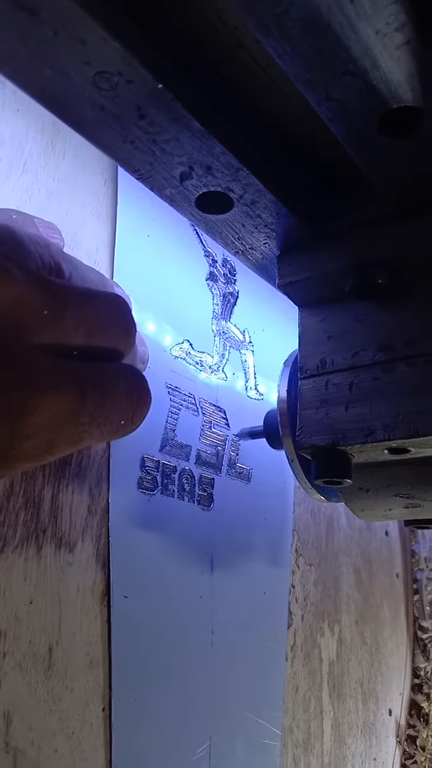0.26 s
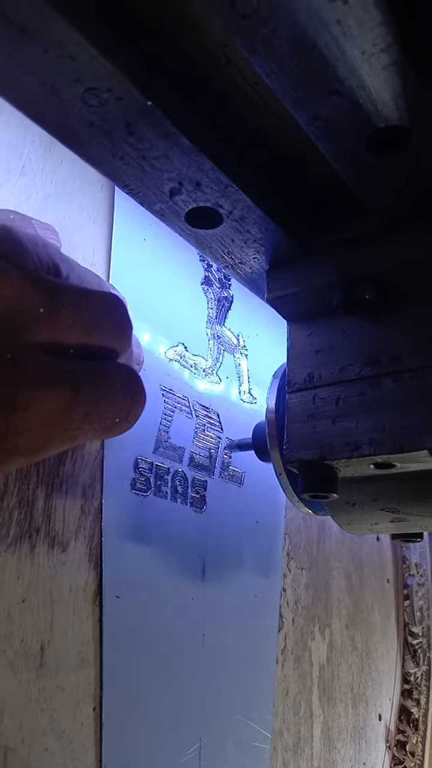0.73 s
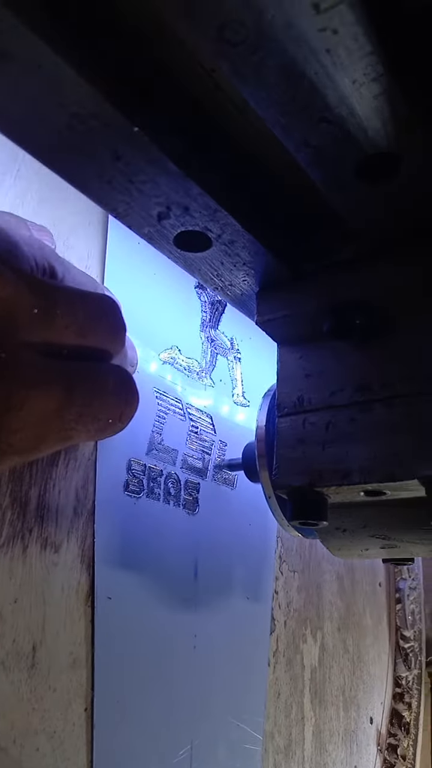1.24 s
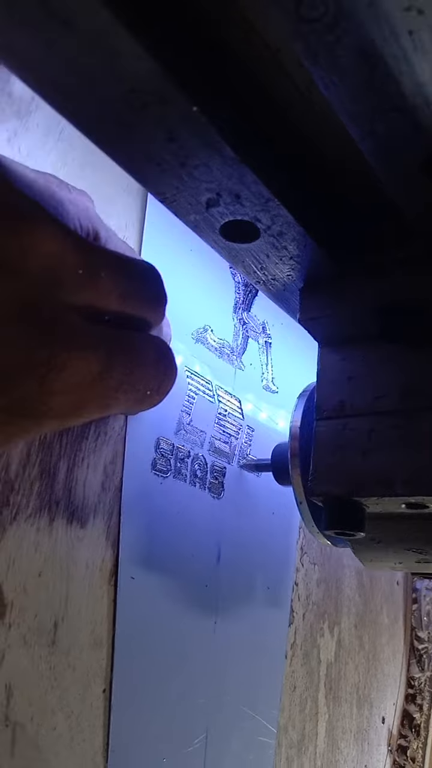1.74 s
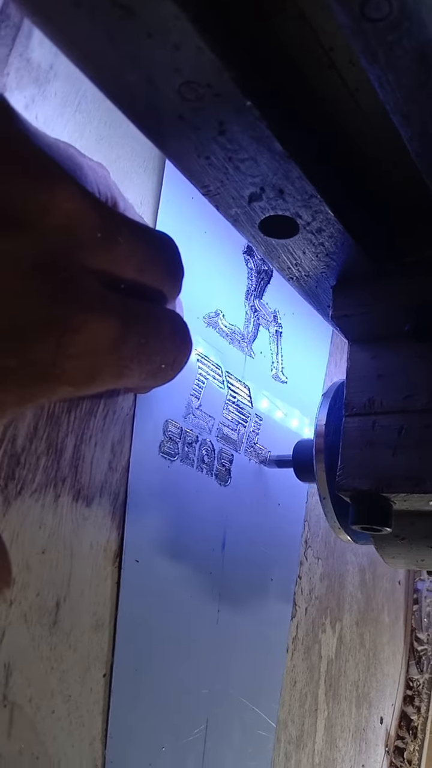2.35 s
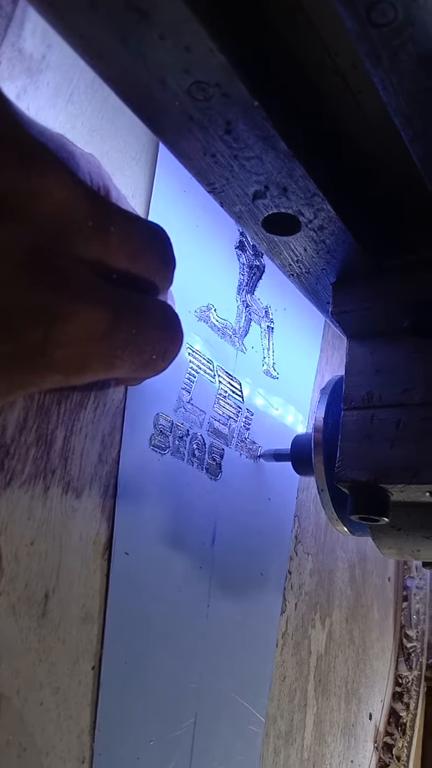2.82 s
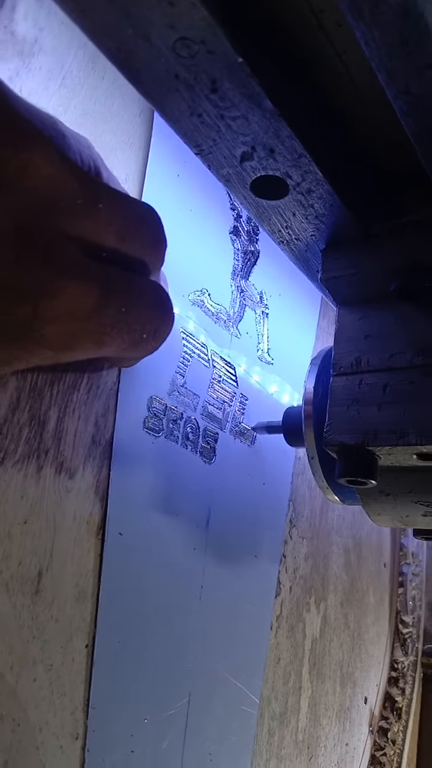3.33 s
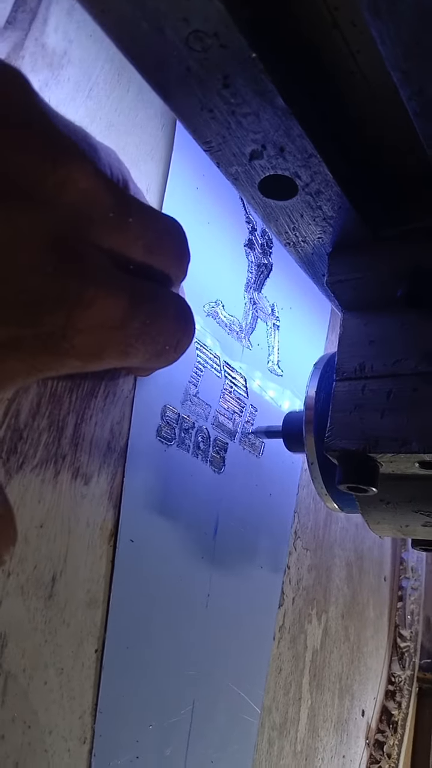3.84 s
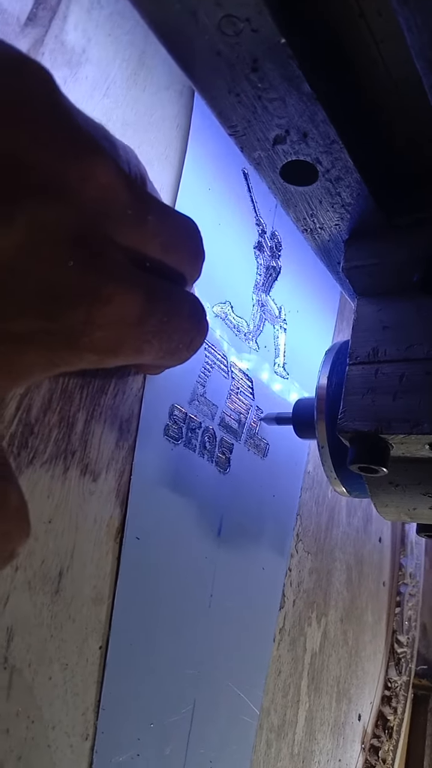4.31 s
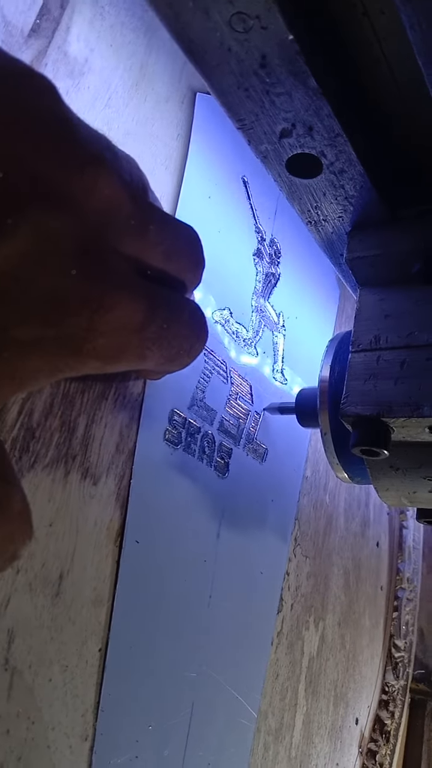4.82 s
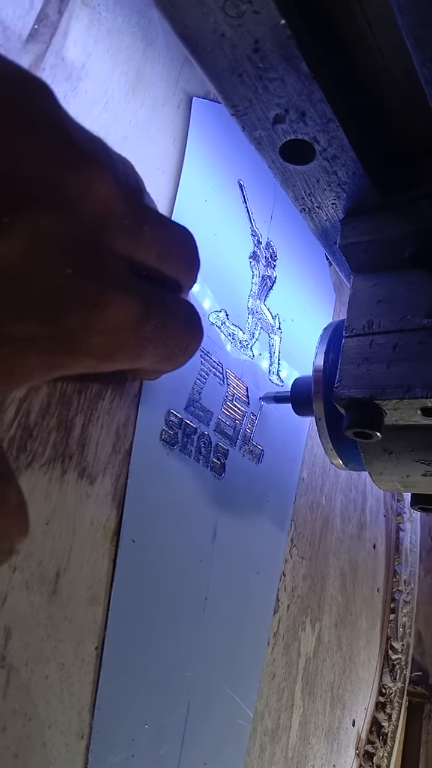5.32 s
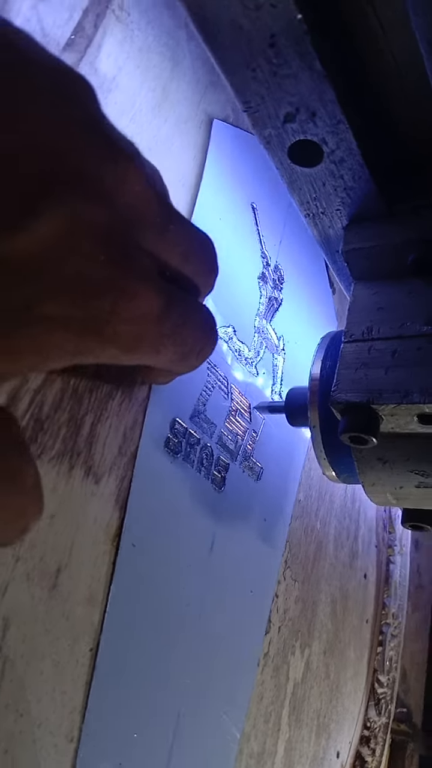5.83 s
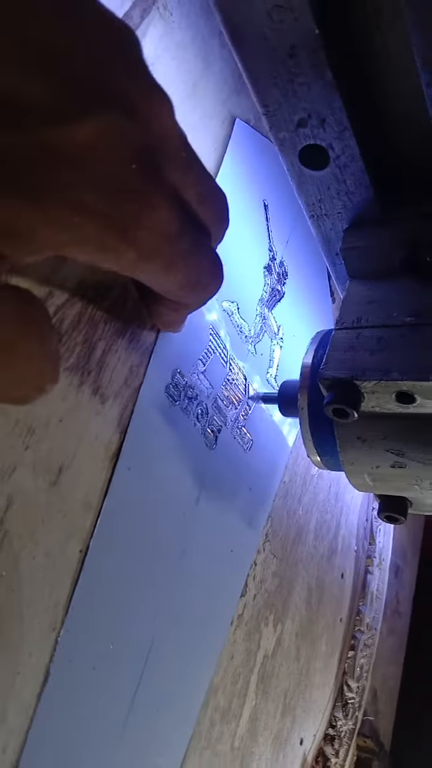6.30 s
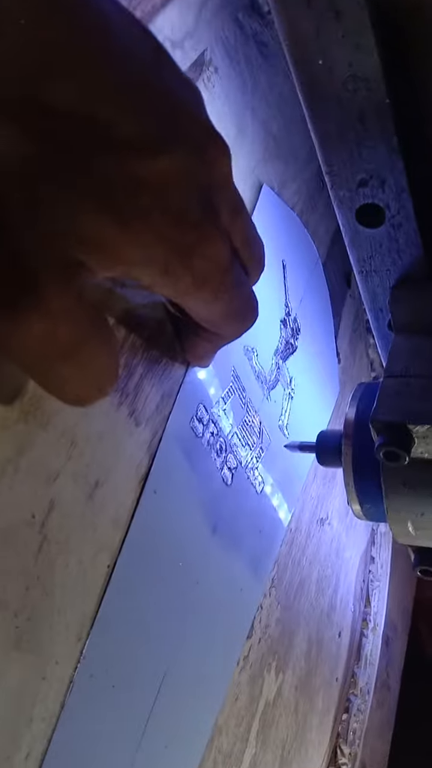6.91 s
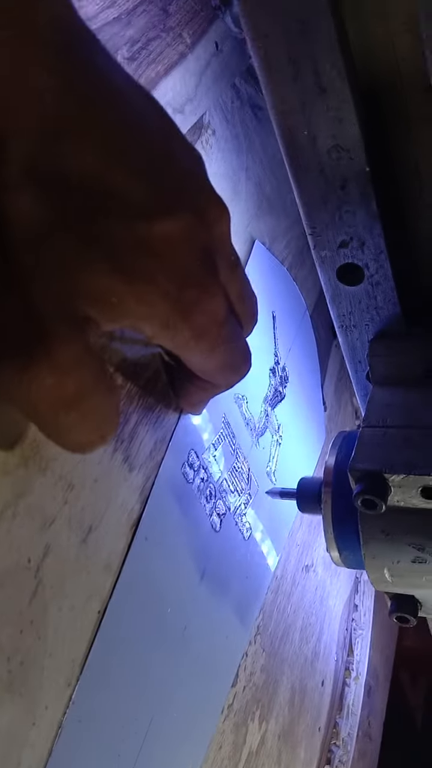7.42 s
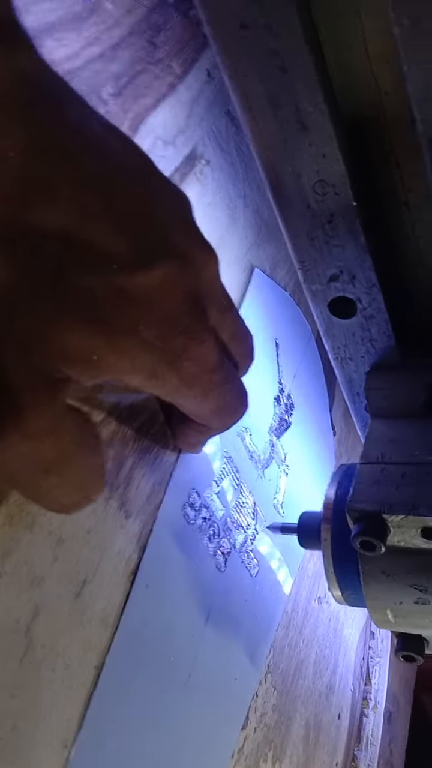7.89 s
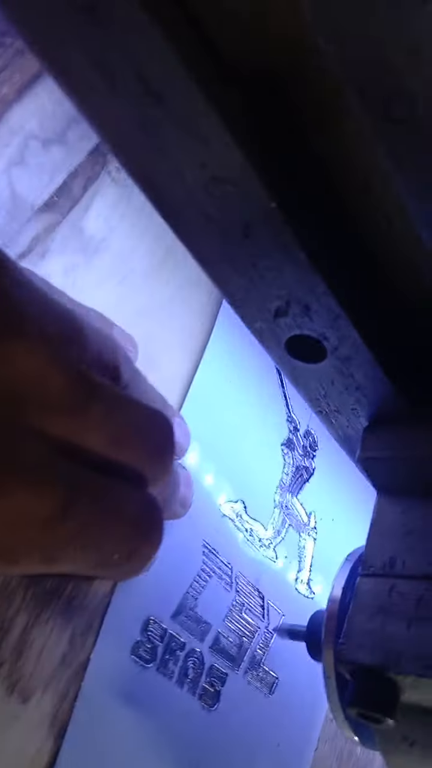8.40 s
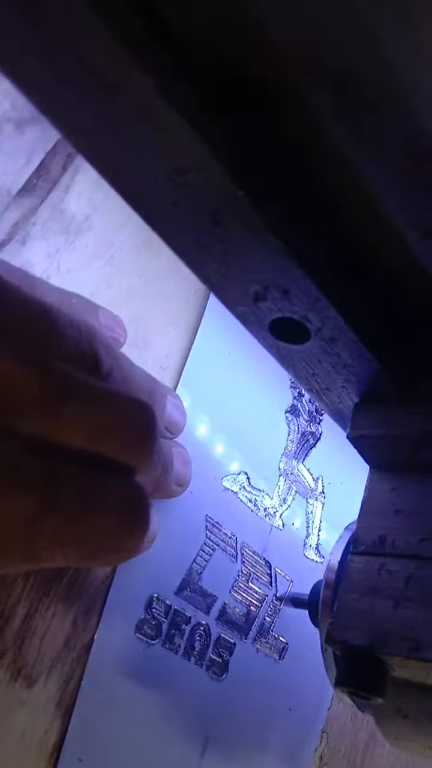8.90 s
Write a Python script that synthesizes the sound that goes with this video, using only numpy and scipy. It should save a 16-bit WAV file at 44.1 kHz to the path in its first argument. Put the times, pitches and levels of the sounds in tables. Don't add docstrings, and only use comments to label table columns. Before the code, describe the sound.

Very close in a small workshop, a high-speed spindle whines without pause while its fine bit engraves a steel sheet. Fan air rushes and brushes hiss. The tone turns harsher and rougher as the cut loads it, pitch sinking slightly, with low axis hums coming and going. Late on the bit lifts and spins smoother in air, pitch climbing, then touches steel again at the very end.

```python
import sys
import numpy as np
from scipy import signal
from scipy.fft import rfft, irfft
from scipy.io import wavfile
from scipy.ndimage import uniform_filter1d, minimum_filter1d, map_coordinates

SR = 44100
rng = np.random.default_rng(int(sys.argv[2]) if len(sys.argv) > 2 else 0)


def natural_amplitude(level_db):
    exponent = np.asarray(level_db, float) / 20
    return 10 ** exponent


def to_wav(sig):
    pcm = np.clip(np.atleast_2d(sig), -1, 1) * 32767
    pcm = np.round(pcm).astype(np.int16)
    wavfile.write(sys.argv[1], SR, pcm.T)


N = 403515

TURN_S = 0.027
CORNER_SHARE = 0.83

# (start [s], shaft order 1 [dB], order 2 [dB], order 3 [dB], order 4 [dB])
STROKE_LEVELS = [(0, -24.5, -26, -22.5, -32.5), (.575, -21.5, -15, -21.5, -32),
                 (1.08, -18.5, -15, -23.5, -28.5), (1.3, -21.5, -13.5, -21, -28),
                 (1.48, -22.5, -13.5, -15.5, -24.5), (1.715, -21, -17.5, -20, -38),
                 (2.81, -17.5, -18.5, -20, -40.5), (3.195, -20, -13, -21.5, -40),
                 (3.24, -21, -32, -18.5, -42), (3.945, -18.5, -22.5, -25.5, -37),
                 (4.13, -20, -26, -20.5, -35), (4.56, -20, -27, -17.5, -32), (4.69, -22, -13.5, -28.5, -29),
                 (5.26, -25, -32.5, -19.5, -29), (5.975, -26, -19.5, -24.5, -28.5),
                 (6.445, -22.5, -15.5, -36, -33), (6.575, -21, -19.5, -26, -21),
                 (6.615, -30, -23.5, -46, -34.5), (6.85, -32, -26, -38, -43),
                 (7.1, -29.5, -26.5, -27, -34.5), (8.13, -38, -26, -20.5, -31),
                 (8.36, -23.5, -23, -23.5, -33.5), (8.868, -17, -21, -34, -34), (8.915, -16, -23, -34, -21)]
# (time [s], half length [s])
SECOND_ORDER_CORNERS = [(1.726, 0.017), (2.752, .035), (3.925, 0.027), (4.14, 0.023), (4.595, .05), (5.41, .05)]
# (time [s], half length [s])
THIRD_ORDER_CORNERS = [(.575, .03), (.73, 0.034), (1.182, 0.1), (1.473, 0.026), (1.7, 0.032), (3.952, .03),
                       (4.06, .04), (5.83, 0.041)]


def bit(shake):
    lifted = gate(6.7, 8.8, ramp_s=.1)
    in_steel = held(STROKE_LEVELS, TURN_S)
    in_air = held(STROKE_LEVELS, settle_s=0.27)
    first, second, third, fourth = (1 - lifted) * in_steel + lifted * in_air
    second_breaks = np.prod([dip(*corner, CORNER_SHARE) for corner in SECOND_ORDER_CORNERS], axis=0)
    third_breaks = np.prod([dip(*corner, CORNER_SHARE) for corner in THIRD_ORDER_CORNERS], axis=0)
    skips = stutter()
    angle = shaft()
    once = tone(angle, first, rough=0.11, rate=40)
    twice = tone(2 * angle + 1.28 + wobble(1.53), second, rough=0.07, rate=54) * second_breaks
    thrice = tone(3 * angle + 1.6 + wobble(1.535), third, rough=0.15, rate=60) * third_breaks * skips
    ring = tone(4 * angle + 2.44 + wobble(1.5), fourth, rough=0.17, rate=30) * skips
    halt = dip(5.962, half_s=0.02, share=.75)
    strikes = once + (twice + thrice) * (1 + shake) + ring
    return uneven_strikes(angle) + strikes * halt * bite()


# (start [s], end [s], level [dB])
UNEVEN_STRETCHES = [
    (0.567, 1.2, -47),
    (1.113, 1.86, -35.5),
    (1.997, 2.29, -31.5),
    (2.29, 4.022, -31),
    (3.99, 4.328, -32),
    (4.317, 6.712, -32),
    (8.887, 9.3, -40.5),
]


def uneven_strikes(angle):
    even_db, ramp_s = -64.5, 0.062
    stretches = [natural_amplitude(db) * gate(start, end, ramp_s) for start, end, db in UNEVEN_STRETCHES]
    half = tone(angle / 2, 0, rough=0.14, rate=43)
    three_halves = tone(3 * angle / 2, -9, rough=0.46, rate=20)
    return (natural_amplitude(even_db) + sum(stretches)) * (half + three_halves)


# (start [s], end [s], skip rate [Hz], share lost [0-1])
RIDGED_PATCHES = [
    (2.08, 2.56, 12.4, 0.87),
    (8.932, 9.2, 29, 0.63),
]


def stutter():
    t = np.arange(N) / SR
    loss = 0
    for start, end, hz, share in RIDGED_PATCHES:
        skips = np.sin(np.pi * hz * (t - start)) ** 4
        loss = loss + share * gate(start, end, .02) * skips
    return 1 - loss


# (time [s], gain [dB])
BITE_GAINS = [
    (1.085, 1.5),
    (1.76, 1.5),
    (3.955, 3),
    (5.98, 2.5),
    (6.455, 1),
]


def bite():
    t, ease_s = np.arange(N) / SR, 0.16
    gain_db = 0
    for s, db in BITE_GAINS:
        gain_db = gain_db + db * gate(s - TURN_S / 2, 99, TURN_S) * np.exp(-abs(t - s) / ease_s)
    return natural_amplitude(gain_db)


# (time [s], speed [Hz])
SHAFT_SPEED = [(0, 582), (.6, 582.8), (1.09, 577.9), (1.39, 571.5), (2.09, 561.8), (2.39, 558.9),
               (2.84, 556.5), (3.2, 553.8), (3.76, 555.4), (4.65, 557.2), (5.4, 550.9), (6.05, 548.1),
               (6.54, 542.3), (7.17, 558), (7.43, 562.9), (7.83, 568.5), (8.75, 576.2), (9.16, 573)]


def shaft():
    return turns(curves(SHAFT_SPEED)[0])


MOTOR_ORDERS = {5: (-28.5, -31.5, -50, -41, -25.5), 6: (-30, -34, -35.5, -35, -29),
                7: (-33, -46, -50.5, -51, -50), 10: (-40, -41.5, -46, -43, -43),
                12: (-49.5, -52, -50, -52, -60)}
# (order, level re blades [dB])
BLADE_FOLLOWERS = [(14, -41.5), (16, -40), (22, -32.5)]
# (time [s], blades [dB], commutator [dB])
WHINE_LEVELS = [(0, -24, -49), (.45, -24, -50), (.8, -31, -57), (1.2, -34.5, -52), (1.55, -26.5, -51),
                (2.75, -32, -55), (3.05, -41.5, -55), (3.5, -39, -43), (4.15, -31.5, -43.5),
                (4.5, -25.5, -52), (4.83, -27.5, -66), (5.45, -26, -44.5), (6.1, -28, -45),
                (6.55, -29, -60.5), (6.88, -35, -39.5), (7.25, -27.5, -39), (8.6, -24, -43),
                (9.15, -38, -46)]
# (time [s], half length [s], share lost [0-1], order)
BENCH_NULLS = [(-0.5, 0.83, .7, 5), (1.7, 0.59, 0.75, 5), (2.98, 0.27, .75, 5), (4, 1, .85, 5),
               (5.5, 1.13, 0.91, 5), (8.15, .3, .7, 5), (1.8, 1.5, 0.58, 6), (3.5, 0.65, 0.37, 6),
               (6.5, 0.48, .85, 6), (8.5, .35, .7, 6), (0.5, .9, .75, 7), (1.5, .75, 0.98, 7),
               (4, 1.6, .4, 7), (8.02, 0.11, 0.83, 8), (8.36, .13, 0.49, 8), (6, .15, .6, 8),
               (-0.2, 1.4, .75, 12)]
SPARK_ROUGHNESS = (.13, .15, .2, .45, .45)


def motor():
    blades_db, commutator_db = curves(WHINE_LEVELS)
    levels = {k: placed(db) for k, db in MOTOR_ORDERS.items()}
    levels[8] = blades_db
    for k, db in BLADE_FOLLOWERS:
        levels[round(k)] = blades_db + db
    left = {k: 1 for k in levels}
    for s, half_s, share, k in BENCH_NULLS:
        left[round(k)] = left[round(k)] * dip(s, half_s, share)
    angle = shaft()
    orders = 0
    for k, db in levels.items():
        orders = orders + left[k] * tone(k * angle + wobble(1.504), db, rough=0.17, rate=30)
    return orders + tone(24 * angle, commutator_db, rough=placed(SPARK_ROUGHNESS), rate=16)


# (fan body [dB], fan rush [dB], top hiss re brushes [dB])
AIR_LEVELS = [(-26, -26.5, -1.5), (-25.5, -29.5, -13), (-28, -33.5, -4), (-26, -36, -3.5), (-24.5, -36, -1)]
# (frequency [Hz], level [dB per Hz])
BODY_SPECTRUM = [(130, -82), (250, -45), (420, -21.5), (620, -16), (850, -8), (1030, -11.5), (1150, -1.5),
                 (1300, -0.5), (1600, -5.5), (1760, -10), (2000, -18), (2800, -16), (3640, -26),
                 (6160, -120)]
# (frequency [Hz], level [dB per Hz])
RUSH_SPECTRA = [
    [(1180, -17), (2000, 0), (2770, -10), (3010, -8), (3410, 0), (4180, -1), (4590, 1), (5240, -9.5),
     (5760, -8.5), (6700, -16.5), (7940, -40.5), (9000, -47), (11700, -74), (19800, -120)],
    [(1180, -34), (2000, -3), (2210, -2.5), (2400, -10), (3230, 1.5), (4100, -10), (4450, -2), (4590, -6),
     (5580, -12), (7180, -33), (9000, -45), (11700, -71), (19800, -120)],
    [(1180, -47), (2000, 0.5), (2230, -3), (2640, -10.5), (3290, -1), (4100, -8), (4740, 0), (6330, -17),
     (6870, -19), (7940, -35), (9000, -34), (11700, -60), (19800, -120)],
    [(1180, -40), (2000, -5), (2250, -5.5), (2480, -14.5), (3350, -5.5), (4200, -15), (4450, -8),
     (4740, -6.5), (5870, -13), (6610, -24.5), (9000, -41), (11700, -69), (19800, -120)],
]
# (time [s], gain [dB])
FAN_NEARNESS = [(0, 0), (.4, 1), (1, -1), (2.2, -1), (3.6, 0.4), (4.6, 1), (4.9, -.5), (5.95, 2),
                (6.25, -1.5), (6.55, .5), (6.82, -2.5), (7.3, 1), (8.25, -0.5), (8.6, 0.5), (9.15, 0)]


def fan():
    body_db, rush_db, _ = (placed(db) for db in np.transpose(AIR_LEVELS))
    body_gain = natural_amplitude(body_db + 0.23 * wobble(1.995) + 0.16 * wobble(5.2))
    body = body_gain * rush(BODY_SPECTRUM, 1214, 1530, patchy_db=0.43, pulse=0.22)
    stance = np.minimum(curves(PHONE_POSITIONS)[0], len(RUSH_SPECTRA) - 1)
    colours = 0
    for k, spectrum in enumerate(RUSH_SPECTRA):
        share = np.sqrt(np.clip(1 - abs(stance - k), 0, 1))
        colours = colours + share * rush(spectrum, 3442, 4324, patchy_db=0.85, pulse=0.068)
    return body + natural_amplitude(rush_db + curves(FAN_NEARNESS)[0] + 0.52 * wobble(9)) * colours


# (frequency [Hz], level [dB per Hz])
HISS_SPECTRUM = [(6500, -40), (7900, -19), (9000, -12.5), (10600, -6), (11600, -2.5), (13000, 3),
                 (13800, -9), (14600, -14), (15600, -31)]
# (time [s], level [dB])
BRUSH_LEVELS = [(0.0, -47.5), (0.61, -51.5), (1.47, -50.5), (2.11, -53), (5.94, -53), (6.06, -46),
                (6.75, -50.5), (6.91, -45.5), (7.77, -44), (8.77, -46), (9.12, -50.5), (9.15, -49)]


def brushes():
    hiss_db = curves(BRUSH_LEVELS)[0]
    top_db = placed(np.transpose(AIR_LEVELS)[2])
    brush = natural_amplitude(hiss_db + .6 * wobble(11)) * rush(HISS_SPECTRUM, 9100, 11980, patchy_db=1.4, pulse=.1)
    top_spectrum = [(12000, -30), (13200, -10), (14200, -1), (15000, -2), (15600, 0)]
    top = natural_amplitude(hiss_db + top_db + 1.2 * wobble(3)) * rush(top_spectrum, 14360, 15250, patchy_db=.8)
    return brush + top


# (start [s], end [s], step rate [Hz], level [dB], width [Hz])
AXIS_MOVES = [(.58, 1.15, 304, -42.5, 30), (.6, 1.8, 246.4, -49, 7.9), (1.05, 1.65, 448, -38.5, 4),
              (2.05, 4, 179, -63, 4), (2.2, 3.9, 451, -47.5, 14), (2.8, 3.2, 122, -64, 8),
              (3.3, 3.97, 302, -40, 3.2), (3.967, 5.22, 436, -42.5, 8.7), (3.98, 4.83, 123.7, -55.5, 9),
              (4.88, 5.22, 121, -58.5, 9), (3.998, 5.4, 244.4, -48.5, 11), (4.6, 5.9, 368, -48, 14),
              (5.5, 6.999, 446, -46, 12), (6.8, 8.2, 100, -76.5, 3.5), (6.85, 7.06, 212, -53, 20),
              (4, 6.6, 174, -64, 4), (6.45, 6.6, 122, -62, 10)]


def drives():
    hum, shake = np.zeros(N), np.zeros(N)
    for start, end, hz, db, width in AXIS_MOVES:
        steps = gate(start, end, .04) * tone(turns(np.full(N, hz)), db, rough=0.6, rate=width)
        hum += steps
        shake += 30 * steps * (hz < 150)
    return hum, shake


# (frequency [Hz], level [dB per Hz])
FRAME_SPECTRUM = [(20, -32), (60, -32), (100, -20.5), (140, -18), (200, -3.5), (300, 6.5), (480, 2.5),
                  (800, 1), (1000, -23)]
# (time [s], level [dB])
FEED_LEVELS = [
    (0, -59),
    (.07, -82),
    (.57, -59),
    (1.82, -60),
    (2.1, -59),
    (6.72, -61.5),
    (7.08, -74),
    (8.85, -56.5),
]


def frame():
    level_db = held(FEED_LEVELS, .06)[0] + 1.6 * wobble(5) + 1.5 * wobble(16)
    return natural_amplitude(level_db) * rush(FRAME_SPECTRUM, 140, 245, patchy_db=0.5)


def workshop():
    spectrum = [(15, -9), (40, -4), (100, -3), (200, -5), (400, -20)]
    return natural_amplitude(-75.5 + 3 * wobble(8)) * rush(spectrum, 20, 200, patchy_db=1.0)


# (time [s], position [0-4])
PHONE_POSITIONS = [(0, 0), (6.02, 0), (6.42, 1), (6.76, 1), (6.82, 2), (8, 2), (8.3, 3), (9.15, 4)]


def placed(values):
    return np.interp(curves(PHONE_POSITIONS)[0], np.arange(len(values)), values)


def rush(spectrum, lo_hz, hi_hz, patchy_db, pulse=0):
    z = signal.stft(rng.standard_normal(N), nperseg=512)[2]
    field = uniform_filter1d(uniform_filter1d(rng.standard_normal(z.shape), 6, 0), 14, 1)
    ridges = uniform_filter1d(rng.standard_normal(z.shape), size=160, axis=1)
    patchy = z * natural_amplitude(patchy_db * unit(field) + 1.9 * unit(ridges))
    noise = signal.istft(patchy, nperseg=512)[1][:N] * (1 + pulse * np.cos(shaft()))
    hz = np.fft.rfftfreq(N, 1 / SR)
    f, db = np.transpose(spectrum)
    colour_db = np.interp(np.log(hz + 1), np.log(f + 1), db, -120, -120)
    shaped = rfft(noise) * natural_amplitude(colour_db)
    inside = irfft(shaped * (hz > lo_hz) * (hz < hi_hz), N)
    return irfft(shaped, N) / np.std(inside)


def tone(angle, db, rough, rate):
    flutter = 1 + rough * (wobble(rate) + 1j * wobble(rate))
    wave = np.real(flutter * np.exp(1j * angle))
    return np.sqrt(2) * natural_amplitude(db) * wave / np.sqrt(1 + 2 * rough ** 2)


def turns(hz):
    return 2 * np.pi * np.cumsum(hz) / SR


def wobble(rate):
    knots = rng.standard_normal(int(N * rate / SR) + 4)
    return map_coordinates(knots, [np.arange(N) * rate / SR])


def unit(x):
    return x / np.sqrt(np.mean(x ** 2) + 1e-20)


def curves(rows):
    s, *cols = np.transpose(rows)
    return [np.interp(np.arange(N) / SR, s, c) for c in cols]


def held(rows, settle_s):
    s, *cols = np.transpose(rows)
    row = np.searchsorted(s, np.arange(N) / SR, "right") - 1
    return uniform_filter1d(np.array(cols)[:, row], size=round(settle_s * SR), axis=1)


def gate(start, end, ramp_s):
    t = np.arange(N) / SR
    return np.clip(np.minimum(t - start, end - t) / ramp_s, 0, 1)


def dip(s, half_s, share):
    return 1 - np.clip(share, 0, 1) * gate(s - half_s, s + half_s, half_s)


def scene():
    hum, shake = drives()
    return (bit(shake) + motor() + fan() + brushes() + frame() + hum + workshop())[None]


def top_cut(x):
    return signal.sosfilt(signal.butter(12, 15510, fs=SR, output="sos"), x)


def record(dry):
    needed = np.minimum(1, .84 / (abs(dry) + 1e-9))
    lowest = minimum_filter1d(needed, size=400)
    gain = uniform_filter1d(uniform_filter1d(lowest, size=200), size=200)
    return top_cut(dry * gain)


dry = scene()
out = record(dry)
to_wav(out)
```